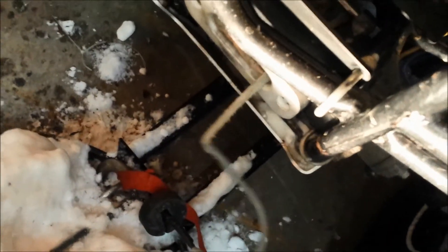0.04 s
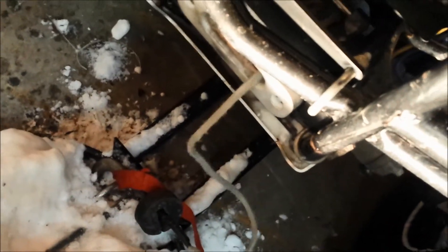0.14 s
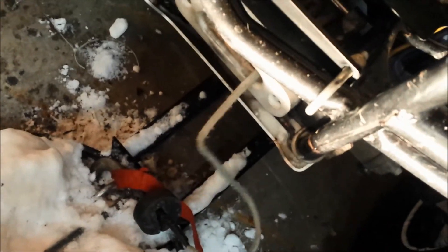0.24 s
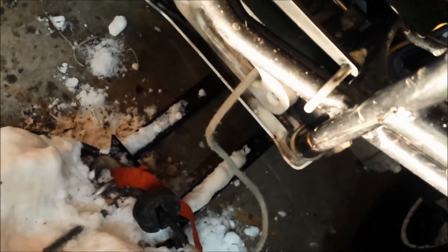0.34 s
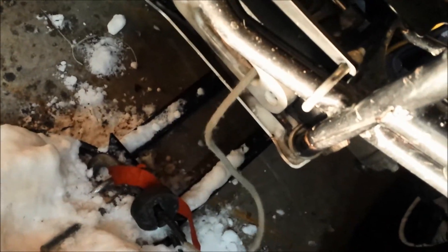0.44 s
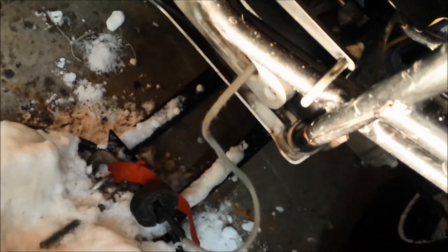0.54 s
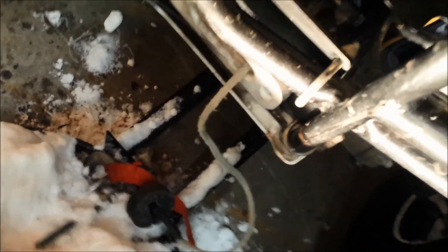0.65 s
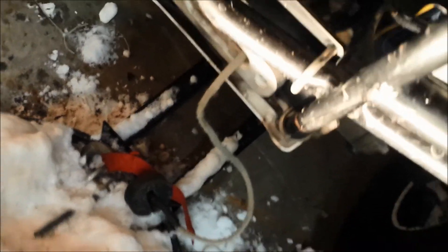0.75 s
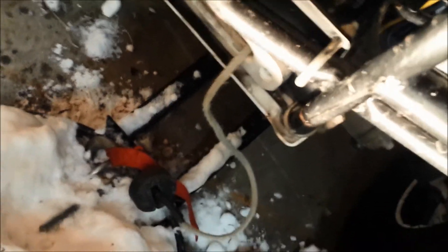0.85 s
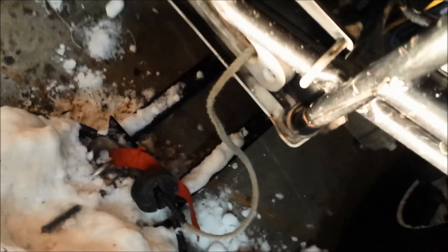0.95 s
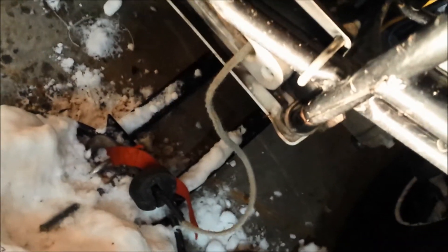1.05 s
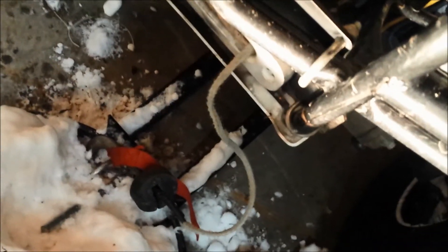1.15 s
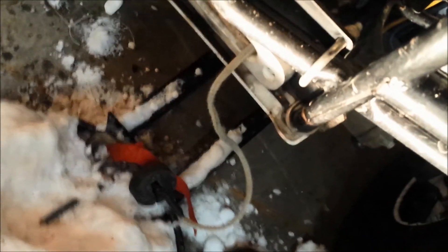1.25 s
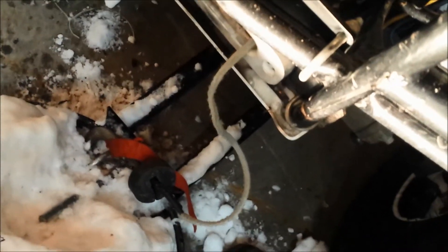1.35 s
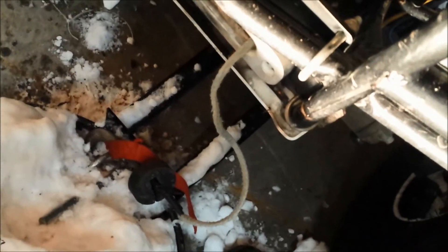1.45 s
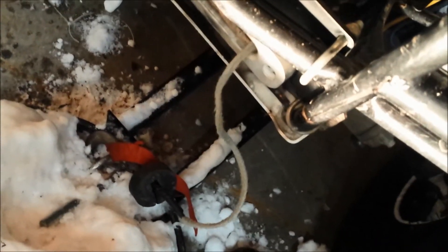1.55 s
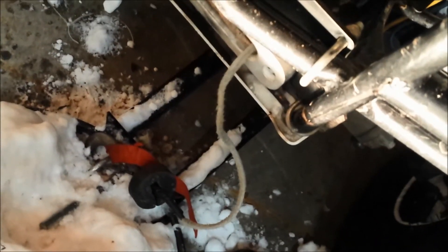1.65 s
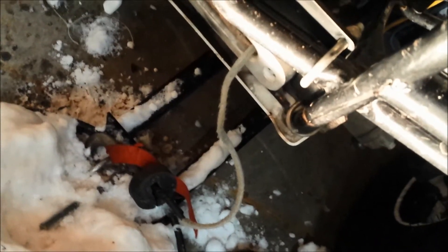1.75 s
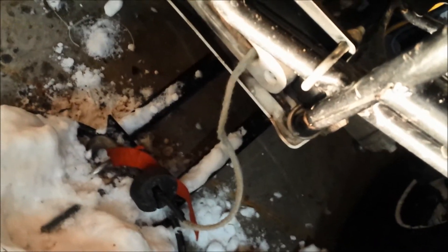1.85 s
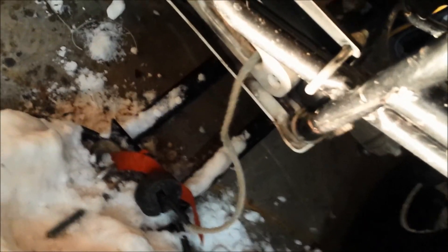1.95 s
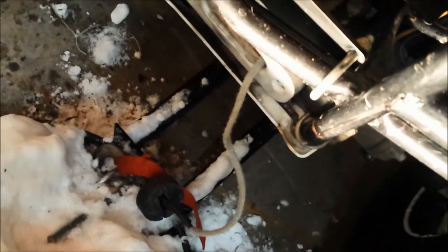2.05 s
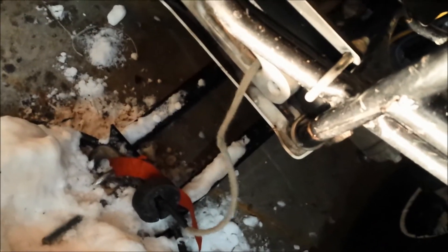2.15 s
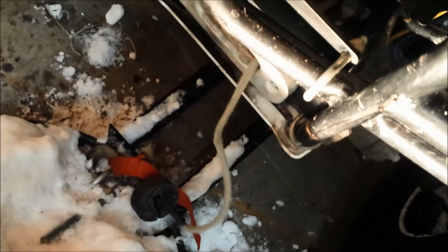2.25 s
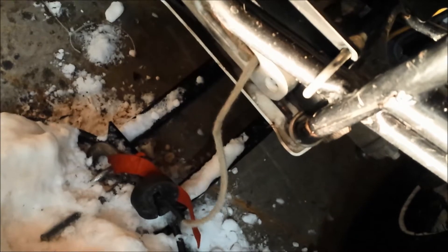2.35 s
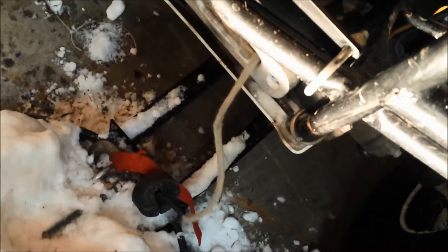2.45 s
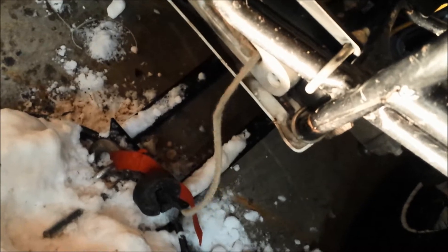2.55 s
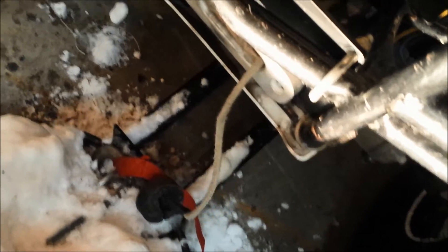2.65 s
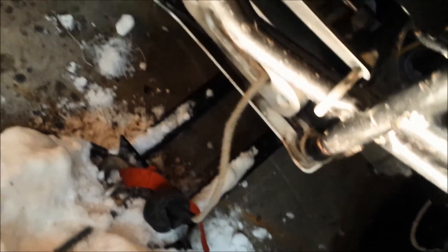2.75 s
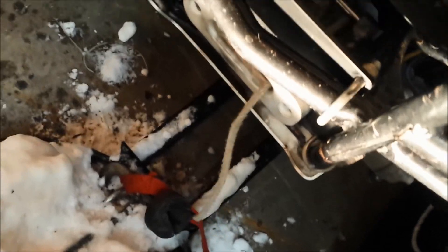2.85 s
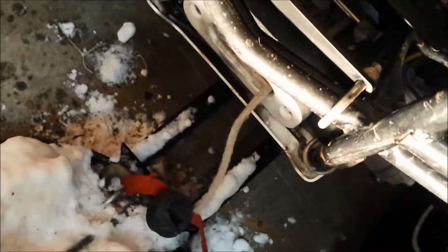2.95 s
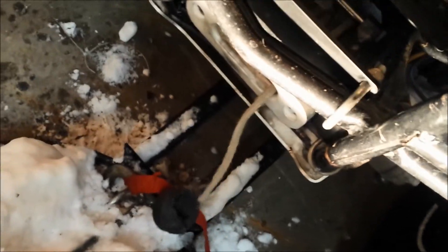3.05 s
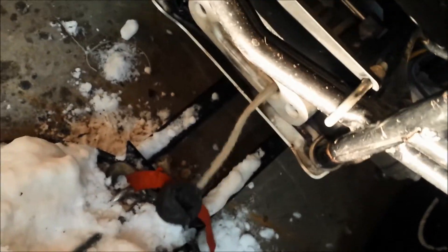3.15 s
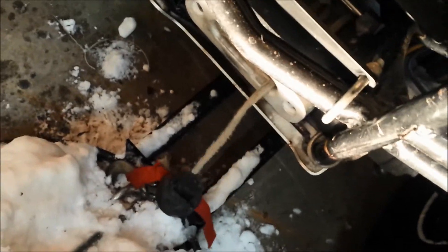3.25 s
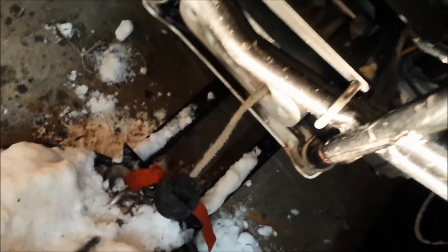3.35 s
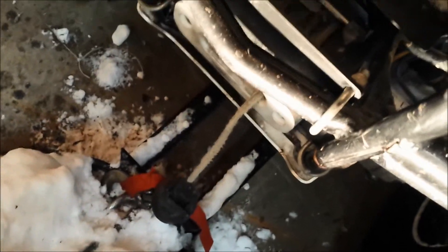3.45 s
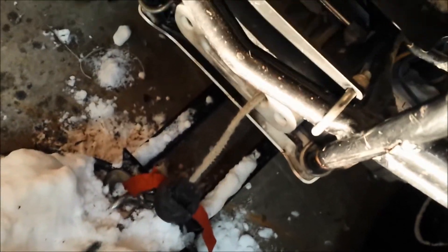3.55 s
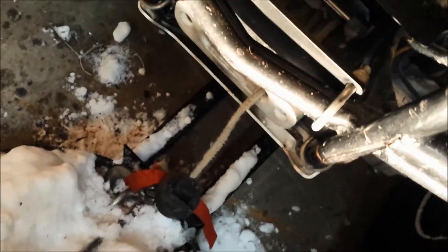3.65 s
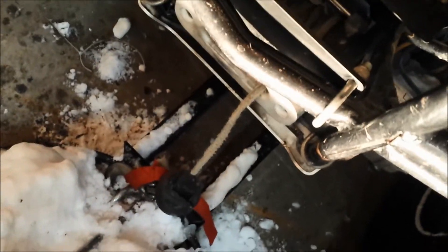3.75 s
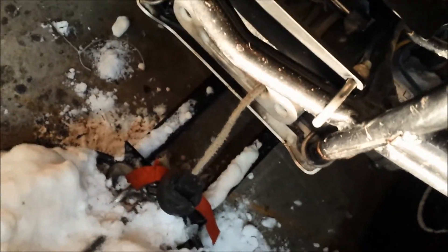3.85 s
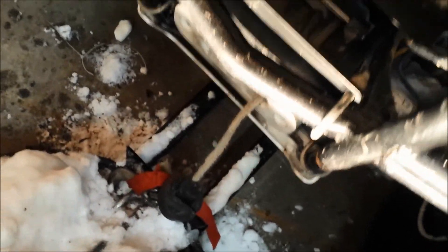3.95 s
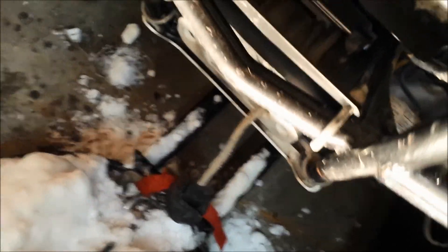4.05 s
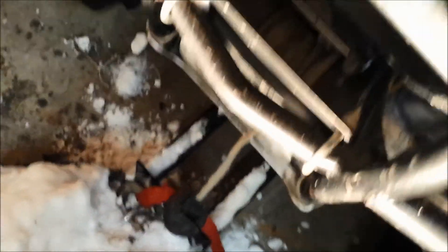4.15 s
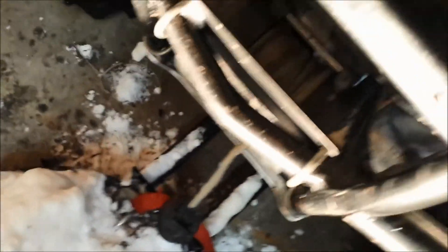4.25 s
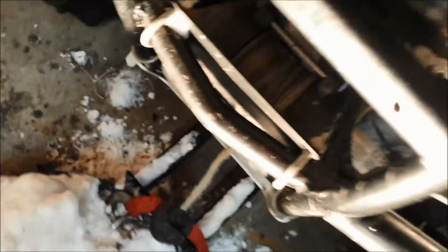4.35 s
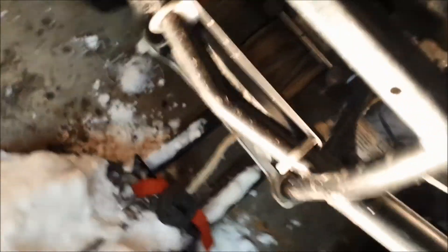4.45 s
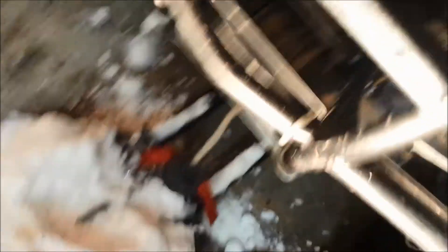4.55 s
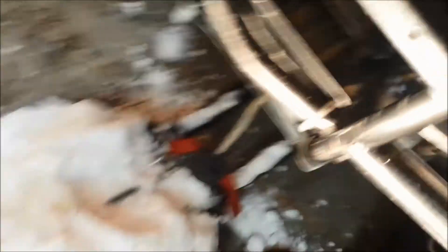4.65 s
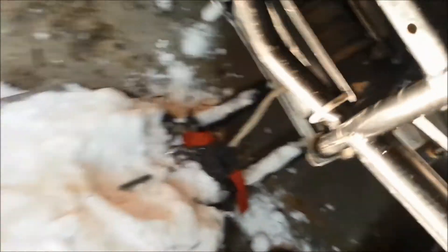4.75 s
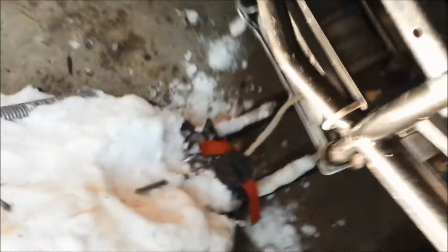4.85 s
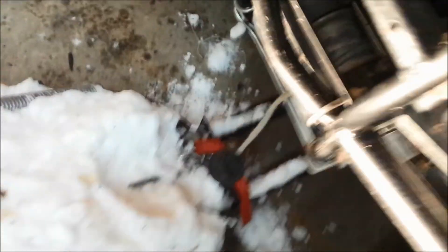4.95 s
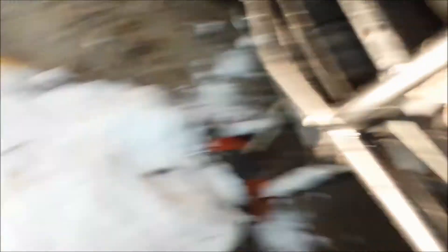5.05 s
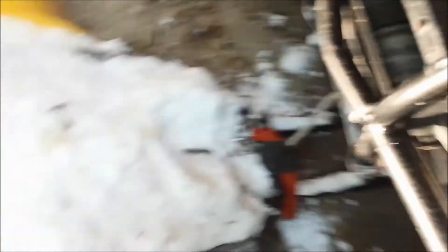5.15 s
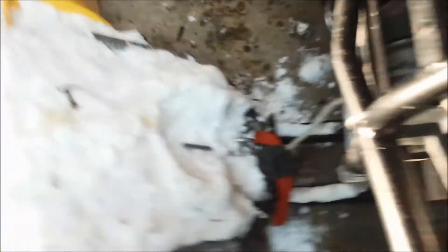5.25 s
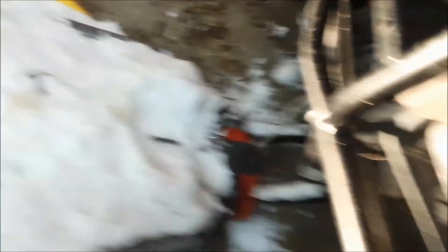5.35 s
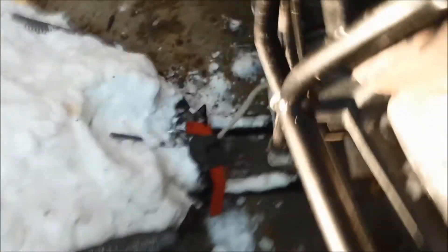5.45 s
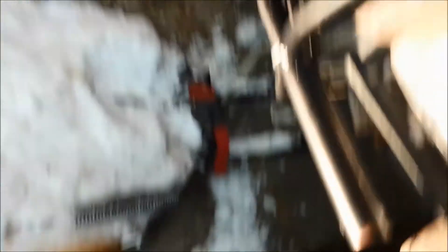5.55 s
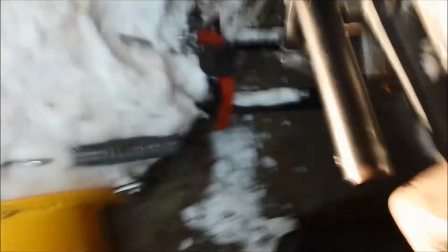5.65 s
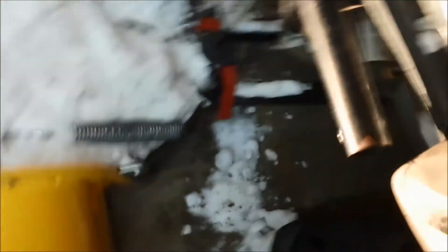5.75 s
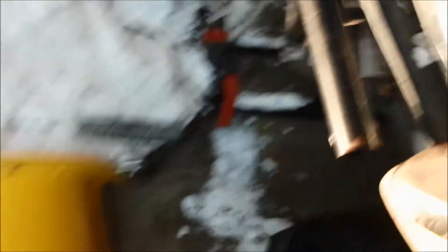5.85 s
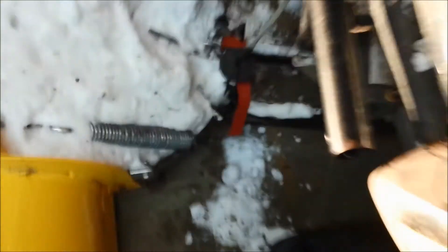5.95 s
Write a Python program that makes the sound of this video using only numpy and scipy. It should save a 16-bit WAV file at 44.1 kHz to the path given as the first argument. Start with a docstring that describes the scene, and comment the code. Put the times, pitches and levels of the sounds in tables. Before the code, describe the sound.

Close to a stereo microphone in a workshop, an electric winch runs with a steady, layered gear whine, low rumble and harsh pulsing brush hiss. Rope rasps and ticks on the drum, with thumps near three seconds. The motor is switched off and runs down in a fraction of a second. After a quiet gap, clothes rustle, soles scuff, and knocks surround one heavy clunk with a brief chatter.

```python
"""Electric winch in a workshop

Close to a two-port microphone, a winch on a vehicle frame reels in rope until it is switched off with a knock.
Gear teeth whine at multiples of the shaft rate and shake the case into a rumble; brushes hiss each turn. The
rope ticks on the drum and the gears rasp: short bursts of shaped noise. The workshop answers with a diffuse
tail. Then someone moves close to the microphone: rustling clothes, scuffing soles, knocks and one clunk, made
of swelling or struck noise and decaying sines, over the quiet of the room."""
import sys
import numpy as np
from scipy import signal
from scipy.fft import rfft, irfft, next_fast_len
from scipy.io import wavfile
from scipy.ndimage import uniform_filter1d, map_coordinates

SR = 44100
rng = np.random.default_rng(int(sys.argv[2]) if len(sys.argv) > 2 else 0)


def wav_out(sig):
    """Save sig, one row per channel (or a flat mono array), as 16-bit PCM at SR to the path in sys.argv[1]."""
    wavfile.write(sys.argv[1], SR, np.round(np.clip(np.atleast_2d(sig).T, -1, 1) * 32767).astype(np.int16))


N = 264149
TIME = np.arange(N) / SR

# Shaft speed under power: faster on slack rope, slower as it pulls tight: (time [s], speed [turns/s])
SHAFT_SPEED = [(0, 45.45), (.22, 44.85), (.36, 45.28), (.58, 44.87), (1.76, 44.92), (1.95, 45.38),
               (2.68, 46.12), (2.92, 45.62), (3.3, 45.05)]
# Gear mesh, planet sidebands and commutator tones: (multiple of the shaft rate, level at mean speed [dB],
# unsteadiness [0-1], flutter rate [1/s], throb depth [dB], level gained with speed [dB per turn/s])
MESH_TONES = [(4.44, -53, 0.6, 22, 0.5, -6.5), (4.71, -50, .7, 25, 1.5, -8),
              (6.16, -53, 0.83, 40, -0.5, -12), (10.36, -48.5, 1, 30, 0.5, 3),
              (11.1, -43.5, 0.15, 24, 2, 2.5), (11.64, -48.5, 0.18, 20, 0, 0.5),
              (12.96, -49, 0.8, 20, 1, 3.5), (14.24, -49.5, 0.83, 30, -4, -4.5),
              (16.07, -59.5, 0.7, 22, -5.5, -7), (21.92, -58.5, 1, 42, 2, 0.5),
              (22.67, -45.5, 0.16, 20, 0, 2.5), (23.32, -52, 0.9, 38, 0.5, 2.5), (31.8, -52, 0.8, 50, 3, 7),
              (33.87, -46, 0.27, 45, 2, 1.5), (34.4, -44.5, 0.97, 85, 1, 2), (36.3, -59.5, 0.9, 97, 5, 6),
              (45.7, -52.5, .98, 90, 7.5, 2), (47.24, -53.5, 1, 90, -2.5, 8), (48.3, -60, 0.8, 40, -2, 6)]
# Colour of the gear case: (frequency [Hz], relative level [dB per Hz])
GEARCASE_COLOUR = [(18, -46), (30, -28), (60, -9.5), (98, -9.5), (120, -3), (155, -4), (205, -2), (290, -4),
                   (385, -10.5), (507, -7.5), (590, -4), (670, -7), (755, -8.5), (922, -8.5), (1020, -10),
                   (1320, -9.5), (1550, -7.5), (1890, -12.5), (2130, -11.5), (3500, -19), (4550, -46),
                   (7700, -120)]
# Colour of the brush hiss before it settles lower: (frequency [Hz], relative level [dB per Hz])
BRUSH_COLOUR = [(1500, -45), (2500, -17.5), (3600, -12.5), (4900, -8), (5500, -6.5), (6050, -3.5),
                (6500, 1), (6900, 0), (7500, -0.5), (7850, -2), (8150, -6), (8480, -11.5), (9100, -8),
                (10100, -11.5), (11600, -8), (12800, -14.5), (13600, -21), (14600, -55)]
# The hiss settles lower: (time [s], share of the settled colour [0-1])
BRUSH_SETTLING = [(2.05, 0), (2.25, 1)]
# Ringing of the brush holders before they settle: (frequency [Hz], relative level [dB])
HOLDER_RINGING = [(4950, -56.5), (5280, -54.5), (5780, -52), (6270, -50.5), (6550, -43), (6980, -45),
                  (7270, -43), (7700, -41)]
# Rope slipping on the drum: (time [s], tick level before trims [dB], snap level [dB], snap pitch [Hz])
ROPE_TICKS = [(0.13, -16, -34.5, 2480), (.304, -14, -36, 4740), (1.202, -19, -46, 5460),
              (2.089, -16, -36, 4260), (2.534, -11.5, -41, 2680), (2.987, -17, -40, 4800),
              (3.035, -8.5, -33, 4400), (3.2295, -11.5, -30.5, 2250)]
# Colour of the rope ticks: (frequency [Hz], relative level [dB per Hz])
TICK_COLOUR = [(1500, -33), (3000, 2), (3900, -2), (5400, 7.5), (7100, 12), (8500, -5), (12000, -4),
               (15000, -39)]
# Soft heavy bumps: (time [s], boom level [dB], punch level [dB], punch pitch [Hz])
THUDS = [(2.993, -33, -27, 190), (3.219, -31.5, -38, 124), (3.389, -35, -33, 151), (3.446, -51, -49, 140),
         (3.678, -65, -56.5, 110), (3.785, -66, -56, 130), (3.979, -54.5, -45, 170),
         (4.535, -61, -48.5, 230), (4.977, -54, -31, 217), (5.341, -48, -35, 240), (5.966, -45, -36.5, 85)]
# Colour of the booms: (frequency [Hz], relative level [dB per Hz])
BOOM_COLOUR = [(25, -16), (60, -11), (110, 1), (160, -11), (230, 0.5), (400, -29), (900, -54)]
# What the clunk rings with: (frequency [Hz], level [dB], t60 [s])
CLUNK_MODES = [(222, -36, 0.17), (338, -22, 0.014), (364, -41.5, .12), (680, -28.5, 0.03),
               (1352, -28.5, .07), (1580, -38, .06)]
# Knocks, the first as the winch is switched off, the rest from handling: (time [s], body level [dB], click
# level [dB], contact time [s], hollow pitch [Hz], brightness of the click [dB per octave], left minus right
# [dB])
KNOCKS = [(3.366, -35.5, -30.5, 0.0073, 443, 0, -5), (3.979, -48, -33.5, 0.0065, 380, 0, 1),
          (4.097, -54.5, -63, 0.0082, 477, 0, -3), (4.537, -55, -47.5, 0.0046, 570, 3, 5),
          (4.602, -65, -55, .003, 600, 0, 8), (4.9745, -42, -44, 0.0065, 410, 5, 0),
          (4.995, -47.5, -41, 0.023, 480, -3.5, -4), (5.2905, -32.5, -26, 0.0095, 1390, -4.5, -2),
          (5.304, -31.5, -25, 0.011, 1570, -1.5, -0.5), (5.419, -50, -38, 0.00225, 420, 11, -2.5),
          (5.461, -49, -41.5, .013, 530, 3.5, -3), (5.534, -49.5, -48, 0.0044, 690, -13, 1),
          (5.563, -55, -47, .002, 1200, 3, -2), (5.612, -58.5, -53, 0.011, 302, 0, 0),
          (5.964, -45.5, -50, 0.0034, 620, -2, -1)]
# Colour of the knocks' dull body: (frequency [Hz], relative level [dB per Hz])
BODY_COLOUR = [(100, -4), (220, 1), (350, -6), (650, -3.5), (1500, -8), (2100, -9.5), (4000, -15.5),
               (7000, -37)]
# Colour of the clicks and of the grit under the soles: (frequency [Hz], relative level [dB per Hz])
CLICK_COLOUR = [(1500, -25), (4000, -14.5), (5500, -9), (6800, 2.5), (7600, 0.5), (8600, -7.5),
                (12000, -4.5), (14500, -25)]
# Soles scuffing: (time of the peak [s], body level [dB], grit level [dB], rise [s], fall [s],
# pitch [Hz], width [octaves])
SCUFFS = [(4.32, -59.5, -53, 0.021, .01, 378, 0.52), (4.763, -48.5, -48.5, 0.018, 0.0079, 500, 0.53),
          (5.192, -47, -43, 0.043, .0078, 700, 1.5), (5.513, -48, -48, .034, 0.026, 1200, 1.05)]
# Arm movements that swish the clothes: (time of the peak [s], swish level [dB], flap level [dB],
# rise [s], fall [s], left minus right [dB])
STROKES = [(4.305, -43, -55, 0.14, .036, 3.5), (5.21, -40.5, -50, 0.2, 0.17, 0),
           (5.76, -47, -58, 0.18, 0.23, 1)]
# Colour of sliding fabric: (frequency [Hz], relative level [dB per Hz])
SWISH_COLOUR = [(1180, -24), (2000, -17), (2210, -28), (3800, -8), (4240, -11.5), (7290, 3.5), (9210, -5.5),
                (11600, -0.5), (14000, -14), (14700, -29.5)]
# Colour of flapping fabric: (frequency [Hz], relative level [dB per Hz])
FLAP_COLOUR = [(25, -6), (80, 6), (200, -1), (470, -5), (900, -11), (3000, -11), (4500, -39)]
# Decay of the workshop's diffuse tail: (frequency [Hz], t60 [s])
WORKSHOP_T60 = [(100, 0.67), (300, 0.31), (1500, 0.23), (5500, 0.3), (7500, 0.3), (9500, 0.35),
                (14000, 0.3)]
# Colour of the quiet room: (frequency [Hz], relative level [dB per Hz])
QUIET_COLOUR = [(20, -8), (60, 7), (130, 2), (300, -10), (700, -15), (3300, -16), (5000, -17),
                (7200, -32.5), (9000, -21), (14700, -33)]
# Likeness of the two microphone ports: (frequency [Hz], left-right correlation [-1 to 1])
PORT_LIKENESS = [(30, 0.18), (130, 1), (290, 0.72), (630, 0.6), (1400, -0.13), (6500, 0.16), (14000, -0.25)]
# Difference in colour of the ports: (frequency [Hz], left minus right [dB])
PORT_BALANCE = [(250, 1), (520, -0.5), (800, -3.5), (1030, -7.5), (1350, -2), (2600, -2), (3900, -1),
                (5000, 1), (6500, 1), (7500, -6), (9800, -2), (12000, -6.5), (13500, -12)]

OFF_S, BRAKE_TURNS_PER_S2 = 3.353, 14  # the switch is released, and how fast the shaft then slows
SURGE_DB, SURGE_S = 4, 0.045  # extra load at first, and the time it takes to ease
PLAY_TURNS = .0007  # the gears wander this far from the shaft, so that their tones waver
THROB_PER_TURN = 2 / 3  # the planet gears bind and free themselves twice in three turns
RUMBLE_DB, RUMBLE_ROOM_DB = -37, -10.5  # gear case under steady load, and the gain of its room sound
STRAIN_DB = 0.06  # more rumble for each turn per s that the shaft loses in a second
COAST_HZ = 650  # below this the rumble lingers longer after the switch is released
SETTLED = .975  # frequency factor of the hiss and ringing once they have settled lower
# a proud commutator bar knocks the near brush, then the far one: hiss gained, place in the turn, settling
KICK_DB, FAR_KICK_DB = 11, 3
KICK_AT, FAR_KICK_AT, KICK_TURNS = .115, .44, .125
RASP_DB, RASP_HZ, RASP_OCTAVES = -48.5, 2460, 0.59  # small rasps of the gears: level, pitch, width
RASP_CLUMP_DB, RASP_GRAIN_DB = 4, 3.5  # how unevenly they bunch up, and how spiky each catch is
THUD_CONTACT_S = 0.0071
# a standing wave of the workshop that each bump sets off; level relative to the punch
ROOM_MODE_HZ, ROOM_MODE_DB, ROOM_MODE_T60 = 209, -20.5, .3
CLUNK_S, CLUNK_ATTACK_S = 5.3112, 0.00066  # a loose part lands heavily
# then it chatters, ever more weakly. First contact: time, body, click, middle pitch
RATTLE_S, RATTLE_DB, RATTLE_CLICK_DB, RATTLE_HZ = 5.328, -46, -31, 237
# from one contact to the next: mean gap and losses; then the length of each contact
RATTLE_GAP_S, RATTLE_LOSS_DB, RATTLE_CLICK_LOSS_DB, RATTLE_CONTACT_S = 0.027, 4.5, 27, 0.0115
FLOOR_PAN_DB = 1  # left minus right, for what scuffs and chatters on the floor
STIR_S, STIR_RISE_S = 3.95, 0.055  # the person starts to move
STILL_DB, STIR_DB = -73, -57.5  # faint rustle before and after that
UNEVEN_DB, FLAP_UNDER_DB = .9, 7  # wavering of the rustle; flapping lies this far under the faint rustle
BUMP_ROOM_DB = -5.5  # gain of the room sound of the rope and the bumps
TOP_HZ = 14800  # band limit of the microphone


def shaft_turns():
    """Turns made by the shaft, which is braked once the switch is released."""
    speed = curves(SHAFT_SPEED)[0] - BRAKE_TURNS_PER_S2 * np.clip(TIME - OFF_S, 0, 1)
    return np.cumsum(speed) / SR


def run_down(t60):
    """Full level while the motor runs, dying away once it is braked."""
    return amp(-60 * np.clip(TIME - OFF_S, 0, 1) / t60)


def whine(turns, backlash_db=1.46):
    """Gear teeth sing at multiples of the shaft rate, fluttering with backlash and throbbing with the planets."""
    speed = curves(SHAFT_SPEED)[0]
    extra = speed - speed.mean()
    bind = np.cos(2 * np.pi * THROB_PER_TURN * turns) + np.cos(2 * np.pi * turns) / 2
    gear_turns = turns + PLAY_TURNS * wobble(20)
    gears = np.zeros((2, N))
    for multiple, db, unsteady, rate, throb_db, speed_db in MESH_TONES:
        throb = unit(amp(throb_db * bind))
        gears += amp(db + speed_db * extra) * throb * tone(gear_turns, multiple, unsteady, rate)
    return gears * unit(amp(backlash_db * wobble(32.14))) * run_down(t60=0.19)


def tone(turns, multiple, unsteady, flutter_rate):
    """A fluttering stereo tone of rms about 1, locked to the shaft."""
    share = np.clip(unsteady, 0, 1)
    random_part = wobble(flutter_rate) + 1j * wobble(flutter_rate)
    flutter = np.sqrt(1 - share) + np.sqrt(share / 2) * random_part
    # the less alike the ports are at this pitch, the further out of step they hear it
    lag = np.arccos(np.clip(along(PORT_LIKENESS, multiple * SHAFT_SPEED[0][1]), -1, 1)) / 2
    port_phase = np.exp(1j * np.array([[lag], [-lag]]))
    return np.sqrt(2) * np.real(flutter * np.exp(2j * np.pi * multiple * turns) * port_phase)


def rumble(turns, level_db, teeth=11.375, scatter_db=3):
    """Teeth meet with uneven force and shake the gear case; its low rumble lingers longest after the motor."""
    tooth = (turns * teeth).astype(int)
    force = amp(scatter_db * rng.standard_normal(N // 32))[tooth]
    case = coloured(force * rng.standard_normal((2, N)), GEARCASE_COLOUR)
    low = filtered(case, lambda hz: 1 / (1 + (hz / COAST_HZ) ** 4))
    return amp(level_db) * (low * run_down(t60=0.46) + (case - low) * run_down(t60=0.36))


def strain_db():
    """The gears rumble harder while the rope slows the motor, and less while it picks up speed."""
    slowing = -np.gradient(curves(SHAFT_SPEED)[0]) * SR
    return STRAIN_DB * uniform_filter1d(slowing, SR // 3)


def brushes(turns, surge_db, count=16, repeat=0.1, slip=0.00086, spark_db=1, edge_db=5):
    """Brushes scrape the same commutator track every turn and click over its bars, one of which stands proud."""
    track = rng.standard_normal((2, 1024))
    angle = (turns + slip * wobble(12)) % 1 * track.shape[1]
    scrape = np.array([map_coordinates(side, [angle], mode="grid-wrap") for side in track])
    share = np.clip(repeat, 0, 1)
    friction = np.sqrt(share) * scrape + np.sqrt(1 - share) * rng.standard_normal((2, N))
    bar, across = (turns * count).astype(int), turns * count % 1
    # each bar edge gives a burst that fades across the bar, and sparks vary it from pass to pass
    sparks_db = spark_db * rng.standard_normal(N // 32)[bar]
    bursts = friction * amp(kick_db(turns) + sparks_db - edge_db * across)
    late = curves(BRUSH_SETTLING)[0]
    lower = [(hz * SETTLED, db) for hz, db in BRUSH_COLOUR]
    hiss = (1 - late) * coloured(bursts, BRUSH_COLOUR) + late * coloured(bursts, lower)
    hiss = hiss * amp(surge_db) * run_down(t60=0.13)
    return amp(-35.1) * hiss + amp(-31.1) * workshop(hiss)


def kick_db(turns):
    """Each brush jumps as the proud commutator bar hits it, then settles over the next few bars."""
    jump = lambda at: np.exp(-((turns - at) % 1) / KICK_TURNS)
    return KICK_DB * jump(KICK_AT) + FAR_KICK_DB * jump(FAR_KICK_AT)


def squeal(turns, squeal_db=1, width_hz=75):
    """The brush holders ring in narrow bands, kicked every turn; their pitch drops a little partway through."""
    bands = lambda hz: sum(amp(db) / (1 + ((hz - centre) / width_hz) ** 2) for centre, db in HOLDER_RINGING)
    ring = filtered(rng.standard_normal((2, N)), bands)
    # reading the ringing more slowly lowers its pitch
    clock = np.cumsum(1 - (1 - SETTLED) * curves(BRUSH_SETTLING)[0])
    ring = unit(np.array([map_coordinates(side, [clock], mode="nearest") for side in ring]))
    level = np.linalg.norm([amp(db) for _, db in HOLDER_RINGING])
    return amp(squeal_db) * level * ring * unit(amp(kick_db(turns))) * run_down(t60=0.38)


def rope(snap_octaves=0.18):
    """Turns of rope slip on the drum with sharp ticks: a crack, a short ring and a snap with its own pitch."""
    tick, snap = np.zeros(N), np.zeros((2, N))
    for s, tick_db, snap_db, pitch_hz in ROPE_TICKS:
        tick += amp(tick_db - 7.5) * blow(s, 0.00045, t60=0.0066, attack=.0001)  # crack
        tick += amp(tick_db - 16.5) * blow(s, 0.0065, t60=0.021)  # short ring
        span = around(s)
        envelope = blow(s, 0.0041, t60=0.013)[span]
        pitched = band(rng.standard_normal((2, len(envelope))), pitch_hz, snap_octaves)
        snap[:, span] += amp(snap_db) * envelope * pitched
    return tick * noise(TICK_COLOUR) + snap


def rasps():
    """The gears rasp in small, ragged bursts of catches that die away with the motor."""
    catches = unit(amp(RASP_CLUMP_DB * wobble(28.07) + RASP_GRAIN_DB * wobble(600)))
    rub = band(catches * rng.standard_normal((2, N)), RASP_HZ, RASP_OCTAVES)
    return amp(RASP_DB) * rub * run_down(t60=0.11)


def thuds(punch_cycles=4.2):
    """Soft heavy bumps: a low push that dies in a few swings, a short boom and the room's standing wave."""
    boom, punch, ring = np.zeros((3, N))
    for s, boom_db, punch_db, hz in THUDS:
        boom += amp(boom_db) * blow(s, THUD_CONTACT_S, t60=0.058, attack=0.0038)
        push = blow(s, .5 / hz, t60=punch_cycles / hz, attack=0.00062)
        punch += amp(punch_db) * swing(s, hz) * push
        swell = blow(s, 0.035, t60=ROOM_MODE_T60, attack=0.037)
        ring += amp(punch_db + ROOM_MODE_DB) * swing(s, ROOM_MODE_HZ) * swell
    return boom * noise(BOOM_COLOUR) + punch + ring


def clunk():
    """One heavy landing: a low push of a few swings and a short woody ring."""
    return sum(amp(db) * swing(CLUNK_S, hz) * blow(CLUNK_S, 1 / hz, t60=t60, attack=CLUNK_ATTACK_S)
               for hz, db, t60 in CLUNK_MODES)


def knocks(ring_db=12, ring_octaves=0.27):
    """Dull contacts: a short knock with its own hollow pitch and a brief bright scrape."""
    out = np.zeros((2, N))
    dull, sharp = noise(BODY_COLOUR), noise(CLICK_COLOUR) * unit(amp(1.5 * wobble(700)))
    for s, body_db, click_db, contact, pitch_hz, tilt_db, pan_db in list(KNOCKS) + rattle():
        span = around(s)
        hollow = lambda hz: amp(ring_db * np.exp(-.5 * (np.log2((hz + 1) / pitch_hz) / ring_octaves) ** 2))
        tilted = lambda hz: amp(tilt_db * np.log2(np.maximum(hz / CLICK_COLOUR[0][0], 1)))
        body = blow(s, contact, t60=0.054)[span] * unit(filtered(dull[:, span], hollow))
        click = blow(s, contact, t60=0.026)[span] * unit(filtered(sharp[:, span], tilted))
        out[:, span] += panned(pan_db) * (amp(body_db) * body + amp(click_db) * click)
    return out


def rattle(count=6, scatter_octaves=0.57):
    """Unevenly spaced contacts of varying pitch, each weaker and duller than the last, as rows of knocks."""
    slip, detune = rng.uniform(-1.6, 1, (count, 2)).T
    k = np.arange(count)
    times = RATTLE_S + RATTLE_GAP_S * (k + 0.17 * slip)
    body_db = RATTLE_DB - RATTLE_LOSS_DB * k
    click_db = RATTLE_CLICK_DB - RATTLE_CLICK_LOSS_DB * k
    pitch_hz = RATTLE_HZ * 2 ** (scatter_octaves * detune)
    contact, pan_db = np.full(count, RATTLE_CONTACT_S), np.full(count, FLOOR_PAN_DB)
    return list(zip(times, body_db, click_db, contact, pitch_hz, np.zeros(count), pan_db))


def scuffs(catch_db=4, catch_rate=350):
    """A sole slides in quick catches, swelling and stopping short: a dull rub with grit on top."""
    out = np.zeros((2, N))
    rub, grit = spread(rng.standard_normal((2, N))), noise(CLICK_COLOUR)
    catches = unit(amp(catch_db * wobble(catch_rate)))
    for s, body_db, grit_db, rise, fall, pitch_hz, octaves in SCUFFS:
        span = around(s)
        stroke = np.exp(np.minimum((TIME[span] - s) / rise, (s - TIME[span]) / fall))
        body = band(catches[span] * rub[:, span], pitch_hz, octaves)
        out[:, span] += stroke * (amp(body_db) * body + amp(grit_db) * catches[span] * grit[:, span])
    return out


def clothes(grain_db=1.0):
    """Fabric slides in fine catches and flaps softly; each stroke swells and dies away over a faint rustle."""
    faint = amp(STILL_DB + (STIR_DB - STILL_DB) * np.clip((TIME - STIR_S) / STIR_RISE_S, 0, 1))
    swish, flap = faint, faint * amp(-FLAP_UNDER_DB)
    for s, swish_db, flap_db, rise, fall, pan_db in STROKES:
        stroke = panned(pan_db) * np.exp(np.minimum((TIME - s) / rise, (s - TIME) / fall))
        swish = np.hypot(swish, amp(swish_db) * stroke)
        flap = np.hypot(flap, amp(flap_db) * stroke)
    catches = unit(amp(grain_db * wobble(400)))
    return amp(UNEVEN_DB * wobble(25)) * (swish * catches * noise(SWISH_COLOUR) + flap * noise(FLAP_COLOUR))


def workshop(x):
    """The room's diffuse answer, starting 5 ms late; each frequency dies at its own speed."""
    hz, t, z = signal.stft(rng.standard_normal((2, SR * 3 // 4)), SR, nperseg=256)
    decay = amp(-60 * t / along(WORKSHOP_T60, hz)[:, None])
    tail = spread(signal.istft(z * decay, SR, nperseg=256)[1])
    tail = np.pad(tail / np.linalg.norm(tail[0]), ((0, 0), (SR // 200, 0)))
    return signal.fftconvolve(x, tail, axes=1)[:, :N]


def quiet_room():
    """The steady, very faint noise of the room."""
    return amp(-72) * noise(QUIET_COLOUR)


def amp(db):
    """Decibels to gain."""
    return 10 ** (np.asarray(db) / 20)


def unit(x):
    """Scale to rms 1."""
    return x / np.sqrt(np.mean(np.abs(x) ** 2) + 1e-20)


def along(points, hz):
    """Read (frequency [Hz], value) points on a log axis."""
    f, v = np.transpose(points)
    return np.interp(np.log(hz + 1), np.log(f + 1), v)


def curves(rows):
    """One value per sample for each column after the time."""
    s, *cols = np.transpose(rows)
    return [np.interp(TIME, s, c) for c in cols]


def wobble(rate):
    """A smooth random curve of rms 1, rate knots a second."""
    return unit(map_coordinates(rng.standard_normal(int(N * rate / SR) + 4), [TIME * rate]))


def filtered(x, response):
    """x times a response of frequency."""
    size = x.shape[-1]
    m = next_fast_len(size + 8192)
    return irfft(rfft(x, m) * response(np.fft.rfftfreq(m, 1 / SR)), m)[..., :size]


def spread(pair):
    """Two unrelated signals become left and right, as alike at each frequency as the two ports."""
    turn = lambda hz: np.arccos(np.clip(along(PORT_LIKENESS, hz), -1, 1)) / 2
    mid, side = filtered(pair, lambda hz: np.array([np.cos(turn(hz)), np.sin(turn(hz))]))
    return np.array([mid + side, mid - side])


def coloured(pair, spectrum):
    """The pair spread to stereo and shaped by the spectrum, at rms 1."""
    return unit(filtered(spread(pair), lambda hz: amp(along(spectrum, hz))))


def noise(spectrum):
    """Stereo noise of rms 1 with the given spectrum."""
    return coloured(rng.standard_normal((2, N)), spectrum)


def band(x, centre_hz, octaves):
    """Keep a bell-shaped band of x, at rms 1."""
    return unit(filtered(x, lambda hz: np.exp(-.5 * (np.log2((hz + 1) / centre_hz) / octaves) ** 2)))


def swing(start, hz):
    """A sine that crosses zero upwards at the start."""
    return np.sin(2 * np.pi * hz * (TIME - start))


def blow(start, contact, t60, attack=0.000066):
    """Envelope of a hit: a fast rise, held during the contact, then ringing down (times in s)."""
    age = np.maximum(TIME - start, 0)
    decay_db = np.maximum(-60 * np.maximum(age - contact, 0) / t60, -200)
    return (1 - np.exp(-age / attack)) * amp(decay_db)


def around(s):
    """The samples that a short event can reach."""
    return slice(max(int(s * SR) - SR // 10, 0), int(s * SR) + SR // 5)


def panned(db):
    """Left and right gains for a level difference."""
    return amp(db * np.array([[.5], [-.5]]))


def scene():
    """The winch, the rope and the handling sounds over the quiet of the room."""
    turns = shaft_turns()
    surge_db = SURGE_DB * np.exp(-TIME / SURGE_S)
    case = rumble(turns, RUMBLE_DB + surge_db + strain_db())
    winch = whine(turns) + squeal(turns) + brushes(turns, surge_db)
    winch = winch + case + amp(RUMBLE_ROOM_DB) * workshop(case)
    ticks = rope() + rasps()
    bumps = thuds() + clunk() + knocks() + scuffs() * panned(FLOOR_PAN_DB)
    room = amp(BUMP_ROOM_DB) * (workshop(ticks) + workshop(bumps))
    return winch + ticks + bumps + room + clothes() + quiet_room()


def record(dry):
    """The two microphone ports differ in colour; nothing is kept above the band limit."""
    return filtered(dry, lambda hz: panned(along(PORT_BALANCE, hz)) * (hz < TOP_HZ))


dry = scene()
out = record(dry)
wav_out(out)
```